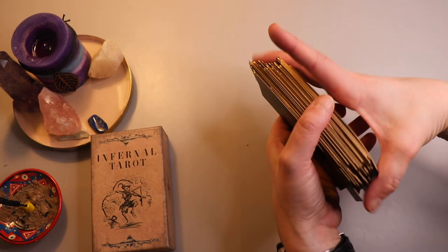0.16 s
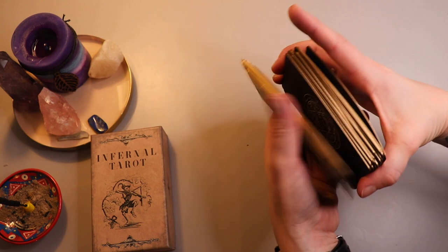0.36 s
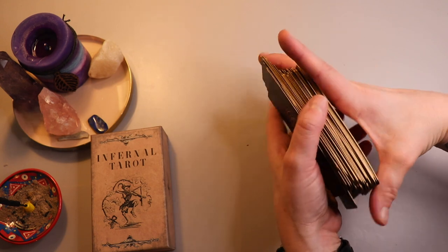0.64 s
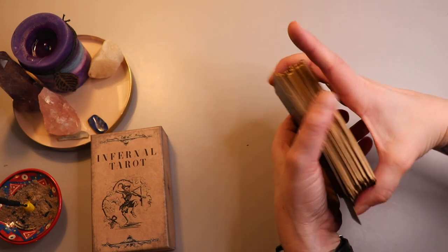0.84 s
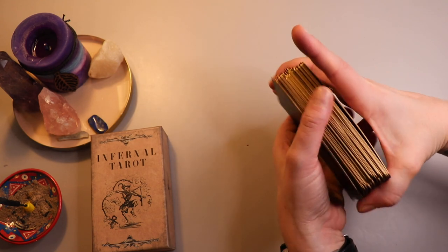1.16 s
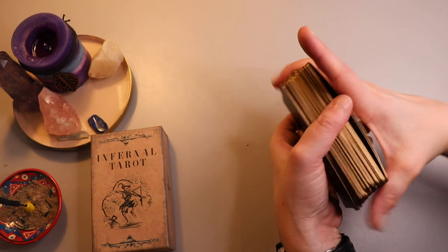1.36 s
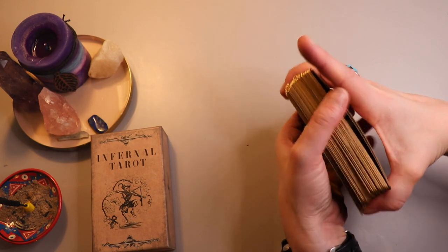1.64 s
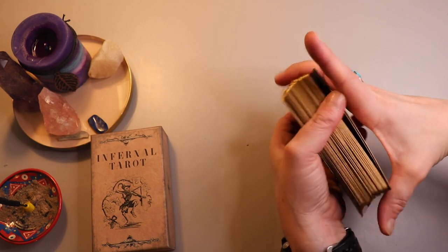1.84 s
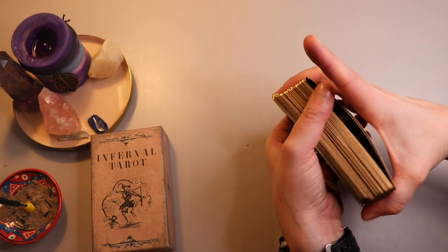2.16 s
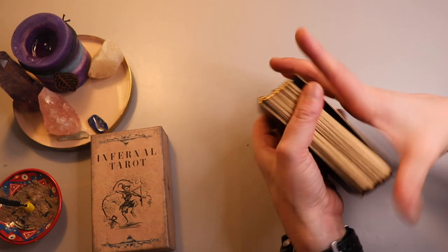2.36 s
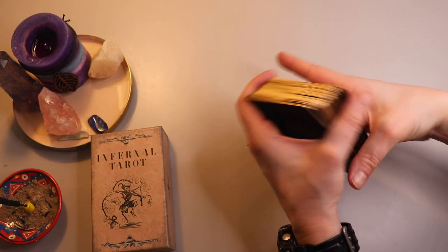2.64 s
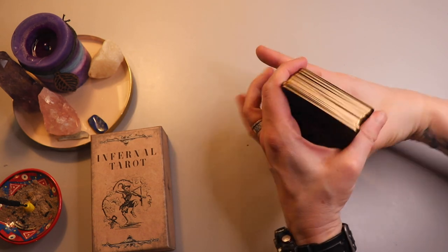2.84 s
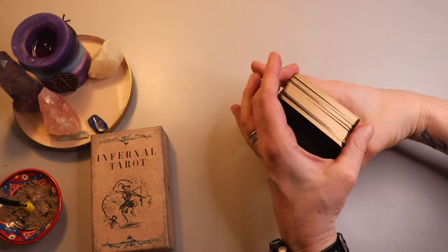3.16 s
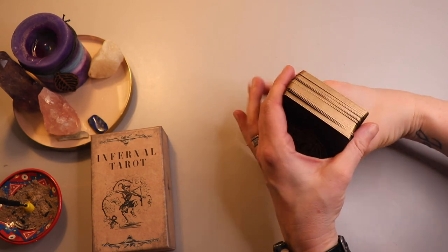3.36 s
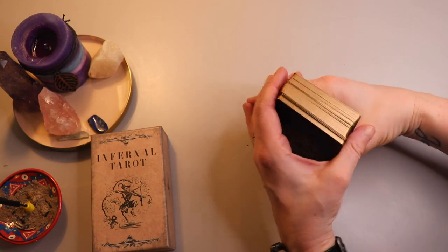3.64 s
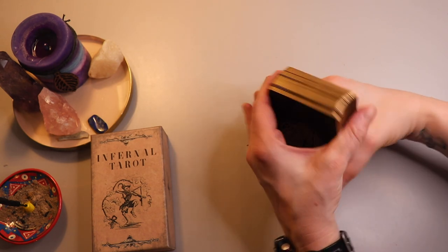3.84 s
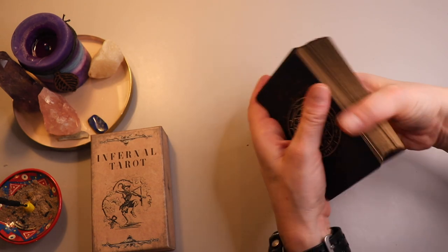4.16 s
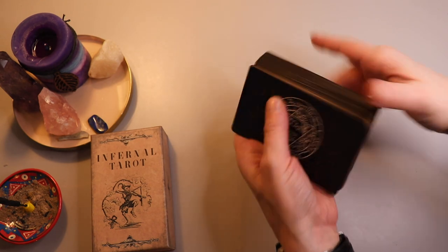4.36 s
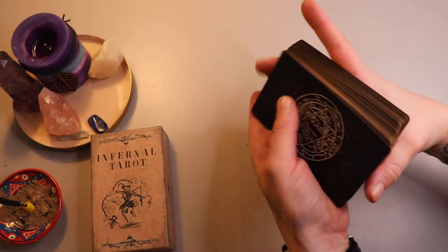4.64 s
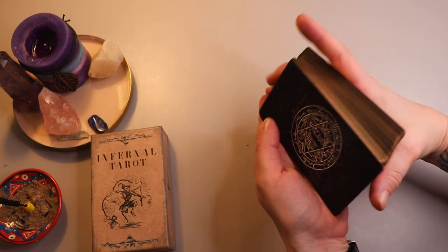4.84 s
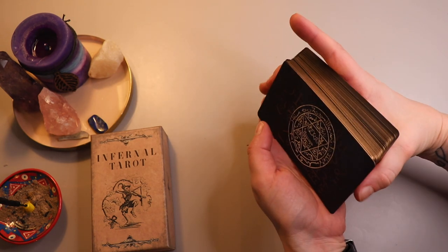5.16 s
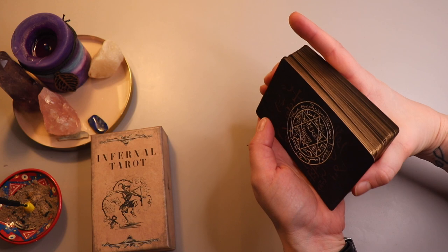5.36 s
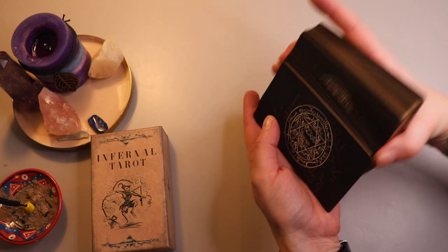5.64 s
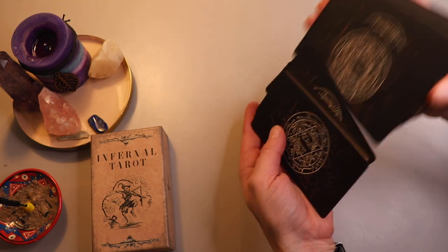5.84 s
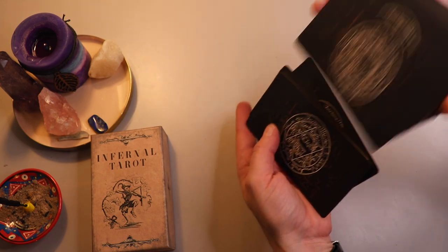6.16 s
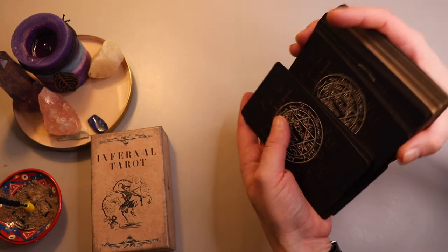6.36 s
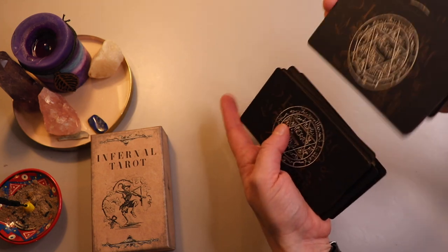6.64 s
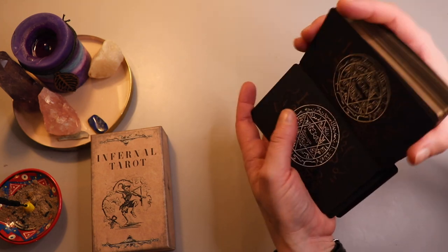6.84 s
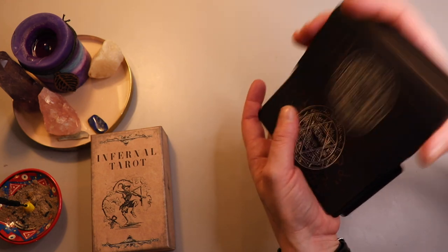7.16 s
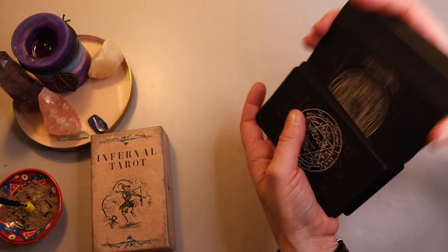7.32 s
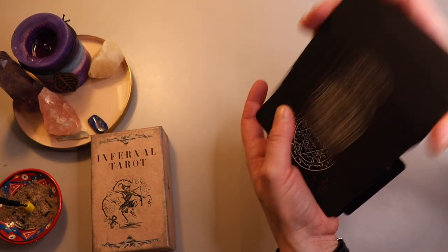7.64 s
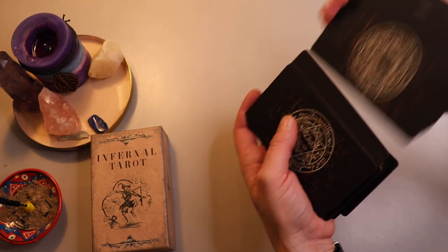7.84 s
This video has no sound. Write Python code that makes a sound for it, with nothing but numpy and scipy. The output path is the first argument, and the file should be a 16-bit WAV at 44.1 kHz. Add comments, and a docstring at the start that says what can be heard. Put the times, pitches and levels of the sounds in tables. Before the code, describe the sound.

Stiff cards slide and tick softly in the hands, the deck knocks twice on a table, then loud quick bursts of shuffling snaps follow.

```python
"""A thick deck of stiff cards is squared, cut and shuffled overhand above a table, close to a microphone.
A quiet hiss runs throughout. First come soft slides of card on card, made from uneven noise that rings
the cards and the air under the hand, and card snaps, made from short rings and cracks. Just after 3 s and
near 3.7 s the table is knocked: noise bursts ring its top, short rings and cracks sharpen the attacks, and
fainter rattles come between and after. Softer slides, snaps and a low thud follow from 4.2 s, then a low
hum of ringing noise near 5.9 s and loud runs of slides and snaps from 6.3 s."""
import sys
import numpy as np
from scipy import signal
from scipy.fft import rfft, irfft, next_fast_len
from scipy.io import wavfile
from scipy.ndimage import map_coordinates

SR = 44100
rng = np.random.default_rng(int(sys.argv[2]) if len(sys.argv) > 2 else 0)


def gain_from_db(level_db):
    """Convert decibel levels to linear amplitude factors (20 dB per decade)."""
    decades = np.asarray(level_db, float) / 20
    return 10 ** decades


def transcribe(u):
    """Save the signal u as a 16-bit wav file named by the first command-line argument.

    u: samples, shape (n,) or (channels, n), limited to [-1, 1]; the rate is SR.
    q: integer samples, one column per channel.
    """
    v = np.clip(np.atleast_2d(u).T, -1, 1)
    q = np.round(v * 32767).astype(np.int16)
    wavfile.write(sys.argv[1], SR, q)


N = 352359  # length in samples, about 8 s

# quiet hiss, its colour: f/Hz, relative level/dB
HISS_COLOUR = [(12, -23), (20, 2.5), (44, -11), (77, -4), (228, -13), (270, -14), (499, -14.5),
               (542, -19.5), (590, -17), (923, -19), (16000, -31)]
# strokes of card on card: peak t/s, scrape level/dB, rise t/s, fall t/s, hollow level above the scrape/dB
STROKES = [(.05, -56.5, .02, 0.032, -15), (.088, -56, 0.032, 0.11, -23), (.31, -50.5, 0.046, 0.045, -9),
           (0.363, -38, 0.051, .04, -7), (.43, -53, .012, 0.068, 8), (.48, -51.5, 0.16, 0.11, -7),
           (.54, -51, 0.067, 0.065, 2), (.66, -52.5, .04, 0.081, -15), (.612, -43, .055, 0.069, -16),
           (.853, -51, 0.018, .06, -8), (0.908, -36.5, .065, 0.11, -2), (1.005, -54.5, 0.027, 0.13, 9.5),
           (1.048, -55.5, 0.091, 0.11, -12), (1.197, -33.5, 0.029, 0.035, -4.5),
           (1.226, -42.5, 0.046, 0.12, 1), (1.355, -59, 0.11, 0.063, -0.5), (1.381, -50.5, .006, 0.076, 2),
           (1.488, -56.5, 0.09, .12, -6), (1.686, -53, 0.03, .1, -3), (1.735, -56.5, 0.092, 0.015, 3),
           (1.818, -57.5, 0.026, 0.027, 4), (1.894, -54.5, .018, 0.031, -5), (1.91, -59, .03, .12, -6),
           (2.134, -57.5, 0.075, 0.055, 0), (2.3, -64, .02, .07, -4), (2.336, -51.5, 0.025, .06, -7),
           (2.581, -36, 0.0023, .042, -8), (2.648, -56, .04, 0.099, -8), (2.684, -53, 0.11, 0.041, -17),
           (2.866, -53, 0.05, 0.038, -15), (2.89, -60, .04, 0.087, -5), (4.164, -56, 0.0098, .12, -6),
           (4.225, -57, .08, .025, -17), (4.255, -58, 0.02, .03, -2), (4.293, -42.5, .03, 0.044, -8),
           (4.33, -51, 0.023, 0.027, -13), (4.353, -50.5, .008, .05, -3), (4.385, -48, 0.055, 0.069, -8),
           (4.468, -55, .1, .06, -15), (4.616, -53.5, .015, 0.044, -14), (4.731, -46.5, 0.022, 0.058, -8),
           (5.706, -46.5, 0.063, 0.25, 0), (5.783, -49, 0.013, .06, 1), (5.876, -40, .16, 0.11, -7.5),
           (5.91, -42, .07, 0.033, -7), (5.934, -32.5, 0.023, 0.05, -6), (6.325, -32.5, 0.0035, 0.053, -7),
           (6.348, -17.5, 0.003, 0.041, -3.5), (6.367, -21, 0.02, 0.081, -3.5),
           (6.42, -24.5, 0.011, .03, -6.5), (6.433, -20, 0.033, 0.032, -6), (6.475, -39, 0.032, 0.091, 3),
           (6.516, -39, 0.077, 0.096, 5), (6.558, -30, 0.12, .04, 7.5), (6.573, -26, 0.022, 0.041, -1),
           (6.84, -27.5, 0.0027, .02, -12), (6.844, -23.5, 0.0058, 0.04, 3.5),
           (6.873, -22.5, 0.022, 0.034, -3), (6.885, -24, .03, 0.034, -2), (6.99, -30.5, 0.01, 0.044, 1),
           (7.004, -30, 0.021, 0.038, 4.5), (7.268, -34, 0.0024, 0.088, -4),
           (7.298, -27.5, 0.036, 0.08, 0.5), (7.33, -25.5, .055, 0.063, -4),
           (7.356, -27, 0.045, 0.04, -1.5), (7.373, -23, 0.044, 0.026, -5), (7.4, -36, .03, 0.097, 2),
           (7.43, -35.5, 0.056, .03, 4.5), (7.444, -25.5, 0.017, .075, 1),
           (7.483, -29.5, 0.04, 0.052, -4.5), (7.748, -19.5, .003, 0.13, -7.5),
           (7.784, -22, .04, 0.069, -2.5), (7.828, -23, 0.082, 0.067, -10.5), (7.872, -27, 0.08, 0.091, -2),
           (7.906, -31.5, 0.05, 0.049, -14.5)]
# how the hands hold the deck: t/s, air pocket f/Hz, hiss and flex level above a middling scrape/dB, dB
GRIP = [(.07, 1040, -3, -16), (.36, 1700, -3, -19.5), (.52, 1520, 1, -13), (.62, 1540, -12.5, -14),
        (.86, 1780, -1, -15), (1.25, 1750, -3, -14), (1.44, 1770, -4.5, -15), (1.7, 1740, -2.5, -17),
        (1.83, 1690, 2.5, -24), (1.9, 1130, -2, -11), (2.13, 1167, 1, -11), (2.34, 1130, -14, -13),
        (2.58, 1240, -16, -3), (2.69, 1220, -7.5, -19), (2.87, 1480, 1, -22), (4.16, 1400, -4, -14),
        (4.29, 1100, 0, -10.5), (4.36, 1330, -2.5, -14), (4.62, 1230, -8, -26), (4.73, 990, -9, -9.5),
        (5.7, 1810, -8.5, -27), (5.9, 1760, -5.5, -15), (5.94, 1560, -7.5, -6), (6.33, 1170, -9.5, -12),
        (6.36, 1610, -6.5, 0), (6.43, 1500, 1, -20), (6.5, 1565, -20.5, -4), (6.58, 1730, -6, -4.5),
        (6.85, 1360, -13.5, 1.5), (6.879, 1217, -7, -11), (6.99, 950, -18, 5.5), (7.019, 1110, -6, 4),
        (7.28, 1660, -1.5, -0.5), (7.33, 1750, -1.5, -21), (7.37, 1415, 1.5, -14), (7.44, 1740, -6, -28),
        (7.49, 1500, -2.5, -7.5), (7.75, 1580, -3, 0.5), (7.8, 1490, -4.5, -29), (7.91, 1780, -4.5, -15.5)]
# bending resonances of the cards: f/Hz, width/Hz, level/dB
CARD_BENDS = [(2506, 830, 8.5), (3262, 97, 10.5), (4080, 970, 2), (4740, 1320, -3.5)]
# bright resonances of the card edges: f/Hz, width/Hz, level/dB
CARD_EDGES = [(6200, 5930, -0.5), (8980, 1550, 3.5), (12200, 990, -19)]
# air pockets between hand and deck, wide to narrow: f/Hz
POCKETS_HZ = [700, 814, 960, 1070, 1240, 1400, 1492, 1640, 1760, 1900, 2040]
# hard strokes blur the pocket's note: level where clatter starts/dB, level where it is full/dB, full share
CLATTER = (-42, -24, .6)
# how long the room rings: f/Hz, time to fall 60 dB t/s
ROOM_DECAY = [(150, 0.49), (1000, 0.46), (3000, 0.4), (10000, 0.27)]
# short rings and cracks (card snaps, sharp knock attacks, a low thud): t/s, ring level before filtering/dB,
# pitch f/Hz, time to fall 60 dB t/s, crack level above the ring's, before filtering/dB
RINGS_AND_CRACKS = [(0.362, -31, 8530, 0.012, 1), (0.428, -38, 1660, 0.0079, -10),
                    (0.618, -40.5, 432, 0.035, -23), (0.622, -33, 2670, 0.01, -13),
                    (0.912, -20.5, 1760, 0.0048, 2), (1.004, -38, 1680, 0.008, -17),
                    (1.19, -22.5, 3060, 0.0084, 0), (1.352, -43, 2550, 0.022, -20),
                    (1.38, -33, 1800, 0.01, -23), (2.582, -21, 2650, 0.0052, -12.5),
                    (2.602, -37, 4200, 0.0062, -2), (3.093, -6.5, 3490, 0.0075, -12.5),
                    (3.098, -9, 1700, 0.0068, -15), (3.143, -12, 4070, 0.009, -7),
                    (3.734, -2, 2000, 0.0082, -19), (3.738, -14, 2720, 0.017, -21),
                    (4.164, -39.5, 2500, 0.007, -4), (4.287, -29, 7890, 0.006, -5),
                    (4.352, -39.5, 1010, 0.0091, -15.5), (4.385, -46, 228, 0.05, -25),
                    (4.398, -39, 990, 0.0066, -1.5), (4.73, -43, 940, 0.012, 10),
                    (5.694, -42, 1710, 0.01, -20), (5.929, -28, 3200, 0.0086, -10),
                    (5.938, -35, 3550, 0.0094, 4), (6.324, -23.5, 1120, 0.0091, -14),
                    (6.33, -26, 1120, 0.007, -11), (6.348, -8.5, 3180, 0.012, -14),
                    (6.365, 0, 1640, 0.0046, -10), (6.472, -19, 1470, 0.0092, -21.5),
                    (6.479, -15, 1580, 0.0088, -22.5), (6.501, -25, 1700, 0.0079, -21),
                    (6.549, -24.5, 1700, 0.011, -18), (6.554, -13.5, 1590, 0.012, -18.5),
                    (6.561, -10, 1730, 0.0093, -17.5), (6.84, -11, 3330, 0.0077, -13),
                    (6.846, -5, 3180, 0.011, -33), (6.857, -16, 3260, 0.012, -15),
                    (6.867, -11, 2460, 0.009, -4), (6.886, -7, 1070, 0.0068, -11.5),
                    (6.889, -19, 800, 0.019, -16), (6.991, -12, 910, 0.011, -21.5),
                    (6.998, -10.5, 840, 0.008, -13.5), (7.267, -21, 3360, 0.015, -10),
                    (7.275, -9.5, 8680, 0.0068, -25), (7.286, -6, 1930, 0.0046, -19),
                    (7.355, -14.5, 3260, 0.013, -3), (7.436, -17.5, 2640, 0.011, -16),
                    (7.442, -11.5, 3000, 0.011, -15.5), (7.447, -20, 1700, 0.0055, 4),
                    (7.747, -11, 3000, 0.0055, -10), (7.771, -9, 3000, 0.0088, -23),
                    (7.909, -17, 3730, 0.0086, -13), (7.933, -28, 3440, 0.0076, -16)]
# blows and rattles on the table: t/s, level before the resonances/dB, time to fall 60 dB t/s,
# turning point of the burst's colour f/Hz, fizz level above the rattle's, before the resonances/dB
KNOCKS = [(3.09, -1, 0.041, 2510, -33), (3.094, -7.5, 0.11, 1580, -18), (3.112, -11.5, 0.11, 1900, -19.5),
          (3.138, -7, 0.059, 2200, -12.5), (3.152, -11.5, 0.066, 2220, -21), (3.18, -31.5, 0.6, 1500, -23),
          (3.368, -26.5, 0.28, 970, -17.5), (3.407, -24, 0.13, 890, -17.5), (3.489, -29.5, 0.1, 880, -24),
          (3.503, -35, 0.061, 1010, -15), (3.558, -37, 0.04, 1500, -28), (3.731, -6.5, 0.056, 1820, -30),
          (3.732, -19.5, 0.17, 700, -41), (3.765, -23, 0.29, 1260, -19), (3.855, -25, 0.13, 1400, -12.5),
          (3.877, -33, 0.098, 1400, -5)]
# weight landing on the table: t/s, push level before the boom/dB, click level above the push/dB
THUMPS = [(3.093, -20.5, 13.5), (3.141, -17.5, -7), (3.407, -39, 25), (3.735, -8.5, 12)]
# resonances of the table top: f/Hz, width/Hz, level/dB
TABLE_TOP = [(227, 15, 0), (303.4, 28, 1), (446, 28.6, 3.5), (648, 57, 0.5), (781, 30, 3.5),
             (885, 124, -0.5), (1116, 20, 0.5), (1218, 45, -2.5), (1395, 23, 0.5), (1754, 94, 4.5),
             (2096, 54, -15), (2600, 175, -1.5), (2770, 46, 0), (3720, 1700, -4)]
# lowest resonance of the table: f/Hz, width/Hz
TABLE_BOOM = (105.6, 15)
# low hum as the deck is parted: t/s, level/dB
HUM = [(5.7, -76), (5.8, -59.5), (5.97, -58), (6.05, -72)]

RISE_BEND, FALL_BEND = 1.69, 2.28  # a stroke swells and fades along these powers of time
MIDDLING_DB, FAINT_DB = -40, -68  # a middling scrape, and the faintest that still changes colour
HOLLOW_LAG = 0.25  # dB gained on the scrape for each dB it falls below its peak
HISS_LAG, FLEX_LAG = 0.081, 0.54  # dB gained on the scrape for each dB it falls below middling
COLOUR_SHIFT_DB = 2.1  # how far the colour of a scrape shifts from card to card
POCKET_WIDTH = 0.07  # width of an air pocket as a share of its pitch


def unit(x):
    """Scales a sound to rms 1."""
    return x / np.sqrt(np.mean(x ** 2) + 1e-20)


def along(points, hz):
    """Reads between (Hz, value) points on a log frequency axis."""
    f, value = np.transpose(points)
    return np.interp(np.log(hz + 1), np.log(f + 1), value)


def filtered(x, response):
    """Multiplies the spectrum of x by a response, with spare room at the end so tails do not wrap."""
    size = next_fast_len(N + SR // 2)
    return irfft(rfft(x, size) * response(np.fft.rfftfreq(size, 1 / SR)), size)[..., :N]


def ringing(x, modes):
    """Sends x through resonances (Hz, width Hz, dB), each answering a push with a fading ring."""
    def response(f):
        total = 0
        for k, (centre, width, db) in enumerate(modes):
            resonance = 1j * f * width / (centre * centre - f * f + 1j * f * width)
            total = total + (-1) ** k * gain_from_db(db) * resonance  # signs alternate
        return total
    return filtered(x, response)


def above(x, hz):
    """Weakens everything below hz with a second-order high-pass."""
    return filtered(x, lambda f: (1j * f / (hz + 1j * f)) ** 2)


def wobble(rate):
    """Draws a smooth random curve with rate knots a second."""
    knots = rng.standard_normal(int(N * rate / SR) + 4)
    return map_coordinates(knots, [np.arange(N) * rate / SR])


def hush():
    """Steady air and microphone noise: coloured noise that drifts a little in level."""
    noise = filtered(rng.standard_normal(N), lambda hz: gain_from_db(along(HISS_COLOUR, hz)))
    return gain_from_db(-53.5 + 0.21 * wobble(2.66)) * unit(noise)


def strokes():
    """Each push swells and fades: gives scrape level, its fall below the peak (dB) and hollowness (dB)."""
    power, peak_db, hollow_db = np.full(N, 1e-12), np.zeros(N), np.zeros(N)
    for s, db, rise, fall, cupped_db in STROKES:
        span = slice(max(round((s - rise) * SR), 0), min(round((s + fall) * SR), N))
        t = np.arange(span.start, span.stop) / SR - s
        swell = np.abs(1 + t / rise) ** RISE_BEND
        fade = np.abs(1 - t / fall) ** FALL_BEND
        own_power = (gain_from_db(db) * np.where(t < 0, swell, fade)) ** 2
        power[span] += own_power
        # where strokes overlap, the stronger one counts for more
        peak_db[span] += own_power * db
        hollow_db[span] += own_power * cupped_db
    level_db = np.maximum(10 * np.log10(power), FAINT_DB)
    fallen_db = np.maximum(peak_db / power - level_db, 0)
    return np.sqrt(power), fallen_db, hollow_db / power


def air_pocket(grit, pitch, level):
    """Air under the hand rings at a pitch set by the gap; hard strokes blur it into a broad clatter."""
    pockets = np.array([unit(above(ringing(grit(), [(hz, POCKET_WIDTH * hz, 0)]), 440)) for hz in POCKETS_HZ])
    # the nearest pocket speaks
    distance = np.log(pitch / np.array(POCKETS_HZ)[:, None]) / POCKET_WIDTH
    shares = np.exp(-distance ** 2)
    note = np.sum(shares * pockets, 0) / np.sqrt(np.sum(shares ** 2, 0))
    start_db, full_db, full_share = CLATTER
    spread = np.interp(20 * np.log10(level + 1e-6), [start_db, full_db], [0, full_share])
    clatter = unit(above(ringing(grit(), [(1700, 1160, 0)]), 420))
    return np.sqrt(1 - spread) * note + np.sqrt(spread) * clatter


def slides():
    """Rough card faces catch and slip: uneven grit rings the cards and the air pocket under the hand."""
    t = np.arange(N) / SR
    level, fallen_db, hollow_db = strokes()
    s, *columns = np.transpose(GRIP)
    pitch, hiss_db, flex_db = [np.interp(t, s, column) for column in columns]
    softer_db = MIDDLING_DB - np.maximum(20 * np.log10(level), FAINT_DB)
    # the pocket sounds on as a stroke fades
    hollow_db = hollow_db + HOLLOW_LAG * fallen_db + COLOUR_SHIFT_DB * wobble(35)
    hiss_db = hiss_db + HISS_LAG * softer_db + COLOUR_SHIFT_DB / 2 * wobble(28)
    flex_db = flex_db + FLEX_LAG * softer_db
    catch_db = 0.8 * wobble(70) + 0.96 * wobble(300)  # all parts feel the same catches

    def grit():
        """Noise that follows the shared catches and adds finer ones of its own."""
        return rng.standard_normal(N) * gain_from_db(catch_db + 1.17 * wobble(1500))

    # each passing card favours another bend
    bends = sum(gain_from_db(COLOUR_SHIFT_DB * wobble(28)) * ringing(grit(), [mode]) for mode in CARD_BENDS)
    scrape = unit(above(above(bends, 1400), 1400))
    hiss = unit(above(above(ringing(grit(), CARD_EDGES), 3000), 3000))
    # the gap changes as cards pass, more when forced
    pitch = pitch * np.exp(np.interp(softer_db, [-10, 5], [0.06, 0.02]) * wobble(40))
    hollow = air_pocket(grit, pitch, level)
    flex = unit(ringing(grit(), [(800, 270, 20.5), (1500, 1100, -1.0)]))  # the whole packet flexes broadly
    return level * (scrape + gain_from_db(hollow_db) * hollow + gain_from_db(flex_db) * flex + gain_from_db(hiss_db) * hiss)


def room(x):
    """The room answers with a noise tail in which each frequency dies at its own speed."""
    hz, t, z = signal.stft(rng.standard_normal(SR // 2), SR, nperseg=256)
    decay = gain_from_db(-60 * t / along(ROOM_DECAY, hz)[:, None])
    tail = signal.istft(z * decay, SR, nperseg=256)[1]
    delayed = np.pad(x, (300, 0))  # in samples, about 7 ms
    return signal.fftconvolve(delayed, tail / np.linalg.norm(tail))[:N]


def rings_and_cracks():
    """Each snap, knock attack or thud gives a short damped ring and a short crack of noise."""
    rings, cracks, t = np.zeros(N + SR), np.zeros(N + SR), np.arange(SR // 20) / SR
    swell = 2 * (1 - np.exp(-(t / 0.00097) ** 2))  # the sound swells over a millisecond or two
    for s, db, hz, t60, crack_db in RINGS_AND_CRACKS:
        overtone = 0.2 * np.sin(2 * np.pi * 2.1 * hz * t + rng.uniform(0, 7.0))
        ring = np.sin(2 * np.pi * hz * t) + overtone
        crack = rng.standard_normal(len(t))
        start = round(s * SR)
        rings[start:][:len(t)] += gain_from_db(db - 60 * t / t60) * swell * ring
        cracks[start:][:len(t)] += gain_from_db(db + crack_db - 60 * t / 0.0066) * swell * crack
    bright = gain_from_db(-1) * ringing(cracks[:N], CARD_EDGES)
    broad = gain_from_db(6.5) * ringing(cracks[:N], [(3000, 5300, 0.0065)])
    return above(rings[:N], 139) + bright + broad


def knocks():
    """Bursts of small contacts ring the table and are heard directly; weight drives its boom."""
    rattle, fizz, weight = np.zeros((3, N + SR))
    t = np.arange(SR // 2) / SR
    hz = np.fft.rfftfreq(len(t), 1 / SR)
    for s, db, t60, turn_hz, fizz_db in KNOCKS:
        start = round(s * SR)
        rise = 0.095 * t60  # the longer a rattle lasts, the slower it starts
        climb = gain_from_db(4.8 * np.log2((hz + 30) / turn_hz))
        colour = climb / (1 + (hz / turn_hz) ** 2.52) / (1 + (hz / (3.25 * turn_hz)) ** 6)
        burst = unit(irfft(rfft(rng.standard_normal(len(t))) * colour, len(t)))
        shape = gain_from_db(db - 60 * np.maximum(t - rise, 0) / t60) * np.minimum(t / rise, 1) ** 1.32
        rattle[start:][:len(t)] += shape * burst
        fizz[start:][:len(t)] += gain_from_db(fizz_db) * shape * rng.standard_normal(len(t))
    for s, db, click_db in THUMPS:
        start = round(s * SR)
        rattle[start:][:len(t)] += gain_from_db(db + click_db - 60 * t / 0.0033) * np.minimum(t / 0.0012, 1)
        weight[start:][:len(t)] += gain_from_db(db - 60 * t / 0.0096)
    direct = gain_from_db(-4.5) * ringing(rattle[:N], [(2000, 2500, 0.0081)])
    direct_fizz = ringing(fizz[:N], [(5500, 2050, 0.0038)])
    top = gain_from_db(-0.5) * ringing(rattle[:N], TABLE_TOP)
    boom = gain_from_db(10.0) * ringing(above(weight[:N], 43.7), [(*TABLE_BOOM, 0)])
    return top + direct + direct_fizz + boom


def hum():
    """As the deck is parted, uneven noise through one narrow resonance gives a low hum."""
    t = np.arange(N) / SR
    level_db = np.interp(t, *np.transpose(HUM), -120, -120)
    catch_db = 0.8 * wobble(70) + 0.96 * wobble(300) + 1.17 * wobble(1500)
    return gain_from_db(level_db) * unit(ringing(rng.standard_normal(N) * gain_from_db(catch_db), [(324, 14, 0)]))


def scene():
    """The close sounds reach the room only weakly; the wide table top fills it more."""
    close = slides() + rings_and_cracks() + hum()
    table = knocks()
    answer = room(gain_from_db(-19.5) * close + gain_from_db(-11.5) * table)
    return (close + table + answer + hush())[None]


def low_pass(x):
    """Removes everything above the highest recorded frequency."""
    return signal.sosfilt(signal.butter(12, 16470, fs=SR, output="sos"), x)


def record(dry):
    """The input rounds off the highest peaks and ends at its band limit."""
    rounded = dry / (1 + np.abs(dry / 0.74) ** 4) ** (1 / 4)
    mix = filtered(rounded, lambda hz: hz < 15800)
    return low_pass(mix)


dry = scene()
out = record(dry)
transcribe(out)
```